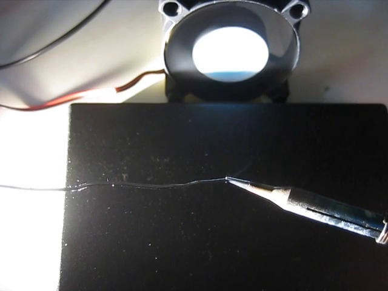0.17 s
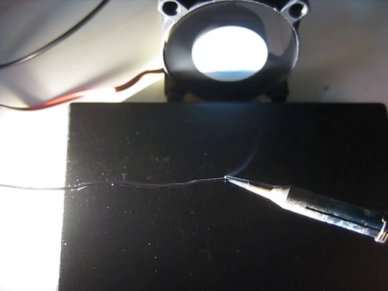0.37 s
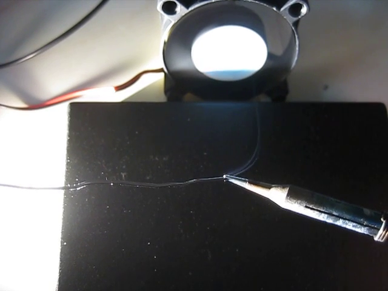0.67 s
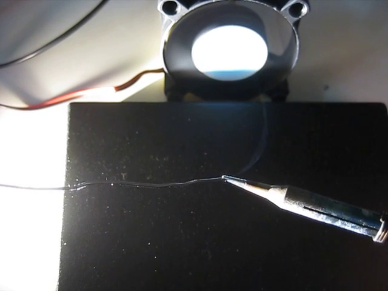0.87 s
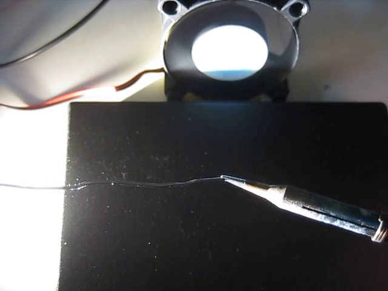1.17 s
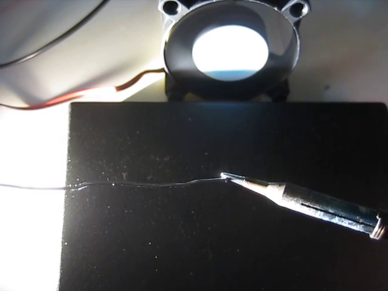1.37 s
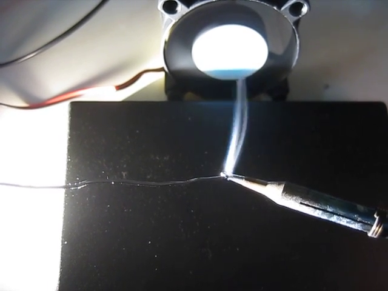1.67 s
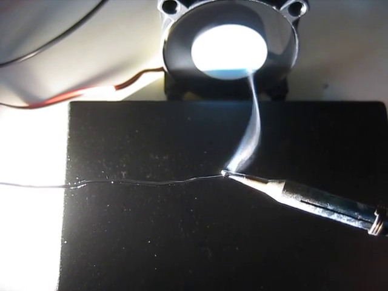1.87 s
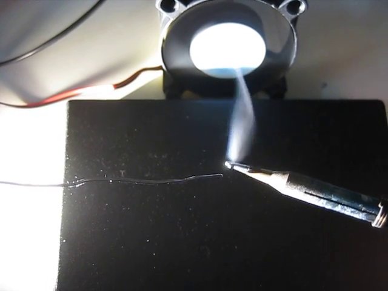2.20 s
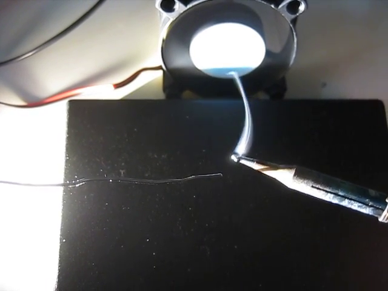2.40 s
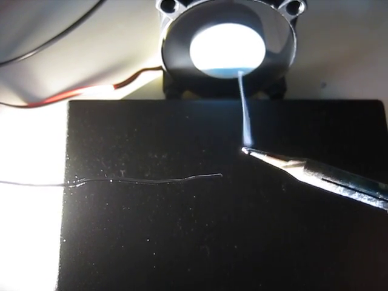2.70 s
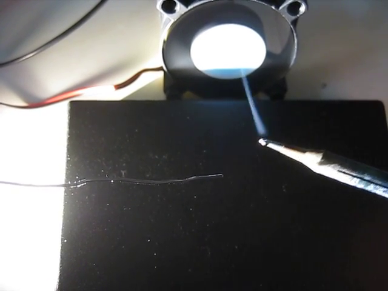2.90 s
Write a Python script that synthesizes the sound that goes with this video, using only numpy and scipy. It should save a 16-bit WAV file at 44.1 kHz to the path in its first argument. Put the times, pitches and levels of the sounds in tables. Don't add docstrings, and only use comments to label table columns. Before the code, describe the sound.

A small cooling fan runs without pause on a workbench, close to a simple camera microphone: steady, breathy air rush with a faint fluttering throb and low motor hum beneath, nothing else heard.

```python
import sys
import numpy as np
from scipy import signal
from scipy.fft import rfft, irfft
from scipy.io import wavfile
from scipy.ndimage import uniform_filter1d

SR = 44100
rng = np.random.default_rng(int(sys.argv[2]) if len(sys.argv) > 2 else 0)


def volts(x):
    e = np.asarray(x, float) / 20
    return 10 ** e


def output_pcm(signal):
    pcm = np.clip(np.atleast_2d(signal).T, -1, 1) * 32767
    wavfile.write(sys.argv[1], SR, np.round(pcm).astype(np.int16))


N = 134505
T_S = np.arange(N) / SR


def walk(rate_hz):
    hold = max(int(SR / rate_hz), 1)
    levels = rng.standard_normal(N // 100)[:N // hold + 1]
    drift = np.repeat(levels, hold)
    for _ in range(2):
        drift = uniform_filter1d(drift, hold)
    drift = drift[:N]
    return (drift - drift.mean()) / drift.std()


# t/s, shaft rate/(turns/s)
SHAFT_SPEED = [
    (0, 36.73),
    (1.5, 36.83),
    (3.05, 36.99),
]


def shaft_turns():
    wobble_ratio, wobble_hz = .0006, 5.96
    t_s, turns_per_s = np.transpose(SHAFT_SPEED)
    speed = np.interp(T_S, t_s, turns_per_s)
    return np.cumsum(speed * (1 + wobble_ratio * walk(wobble_hz))) / SR


def bumps_db(hz, table):
    total_db = 0
    for centre_hz, width_hz, lift_db in table:
        total_db = total_db + lift_db / (1 + (2 * (hz - centre_hz) / width_hz) ** 2)
    return total_db


# f/Hz, density/dB
AIR_COLOUR = [(22, -10.5), (200, -8), (900, -3), (2200, -1.5), (4500, -10.5), (6800, -21), (10000, -28.5),
              (15500, -32.5)]
# f/Hz, width/Hz, lift/dB
FRAME_RESONANCES = [(388, 83, 2.5), (546, 320, -2), (882, 120, 4), (1258, 204, 4), (1560, 81, -3),
                    (2020, 500, 2), (2580, 100, -8), (2945, 162, 5.5), (3246, 214, -5.5), (4000, 370, 3.5),
                    (4320, 220, -3), (4984, 490, 5), (734, 82, -0.5), (2264, 104, -2)]
# f/Hz, width/Hz, lift/dB
CAVITY_RIPPLES = [(5440, 270, -3), (6020, 530, 6), (6900, 400, 1.5), (8550, 430, 5), (9000, 180, -2),
                  (9540, 700, 7), (10700, 500, 5.5), (11870, 570, 6.5), (12300, 250, 0), (12800, 400, 5),
                  (13100, 300, 4), (14150, 500, 3), (15250, 400, 5)]


def air_rush(turns):
    level_db, swell_db, swell_hz = -41, .15, 4.2
    patch_db, patch_hz = .07, 10
    flicker_db, flicker_hz = .67, 40
    gust_s, gust_length_s, gust_db = 1.37, .045, 1
    throb_4_per_turn, throb_2_per_turn = .038, .056

    hz = np.maximum(np.fft.rfftfreq(N, 1 / SR), 1)
    colour_hz, colour_db = np.transpose(AIR_COLOUR)
    shape_db = np.interp(np.log(hz), np.log(colour_hz), colour_db)
    shape_db = shape_db + bumps_db(hz, FRAME_RESONANCES) + bumps_db(hz, CAVITY_RIPPLES)
    spectrum = rfft(rng.standard_normal(N)) * volts(shape_db)

    band_place = np.clip(2 * np.log2(hz / 125), 0, 14)
    patches = [walk(patch_hz) for _ in range(5)]
    rush = 0
    for band in range(15):
        share = np.cos(np.pi / 2 * np.clip(band_place - band, -1, 1)) ** 2
        band_db = patch_db * patches[band // 3] + flicker_db * walk(flicker_hz)
        rush = rush + irfft(spectrum * share, N) * volts(band_db)

    throb = 1 + throb_4_per_turn * np.sin(8 * np.pi * turns)
    throb = throb + throb_2_per_turn * np.sin(4 * np.pi * turns)
    gust = np.exp(-((T_S - gust_s) / gust_length_s) ** 2)
    rush = rush * throb * volts(swell_db * walk(swell_hz) + gust_db * gust)
    return rush * volts(level_db) / rush.std()


# order/(f/shaft rate), level/dB
SHAFT_ORDERS = [(7, -76), (8, -60.5), (9, -67), (10, -56.5), (11, -72), (16, -56.5), (18, -68), (22, -54.5),
                (25, -64), (28, -61), (32, -60), (34, -55.5), (36, -66), (44, -64)]


def shaft_hum(turns):
    waver_hz, waver_db_per_order = 7, .06
    hum = 0
    for order, level_db in SHAFT_ORDERS:
        gain = np.sqrt(2) * volts(level_db + waver_db_per_order * order * walk(waver_hz))
        hum = hum + gain * np.sin(2 * np.pi * (order * turns + rng.random()))
    return hum


def scene():
    turns = shaft_turns()
    return (air_rush(turns) + shaft_hum(turns))[None]


def band_limit(x):
    return signal.sosfilt(signal.butter(12, 15980, fs=SR, output="sos"), x)


def record(dry):
    rumble_cut_hz, top_hz = 19, 15735
    notch_hz, notch_widths_hz = 7877, (510, 250)
    start_s, fade_in_s = .03625, .0012
    x = signal.sosfilt(signal.butter(2, rumble_cut_hz, "high", fs=SR, output="sos"), dry)
    for width_hz in notch_widths_hz:
        x = signal.lfilter(*signal.iirnotch(notch_hz, notch_hz / width_hz, SR), x)
    x = x * np.clip((T_S - start_s) / fade_in_s, 0, 1)
    x = signal.sosfilt(signal.ellip(12, .3, 45, top_hz, fs=SR, output="sos"), x)
    return band_limit(x)


dry = scene()
out = record(dry)
output_pcm(out)
```